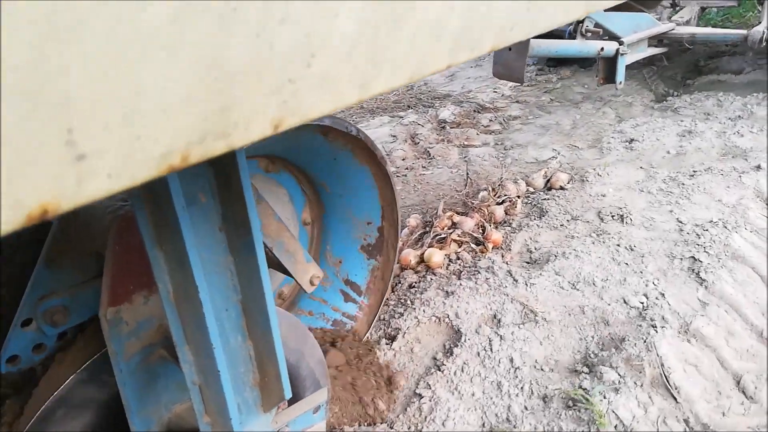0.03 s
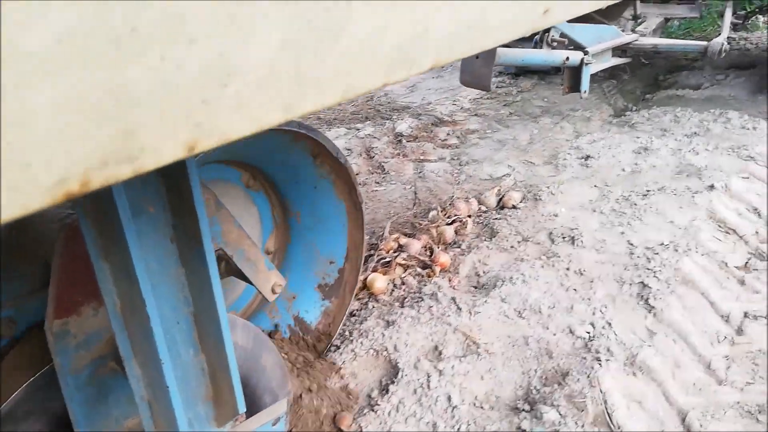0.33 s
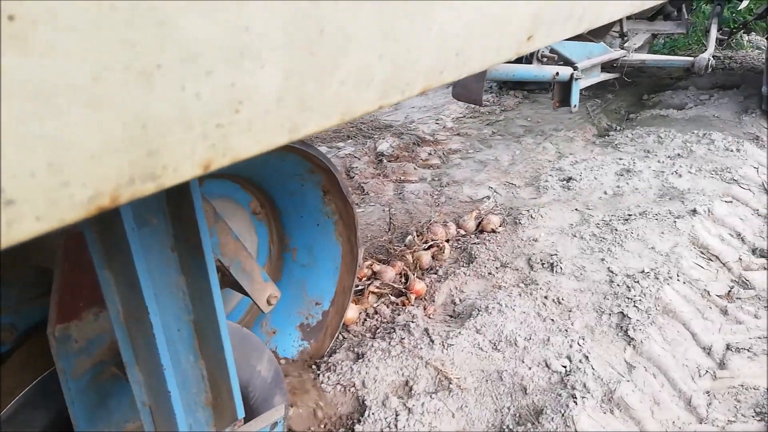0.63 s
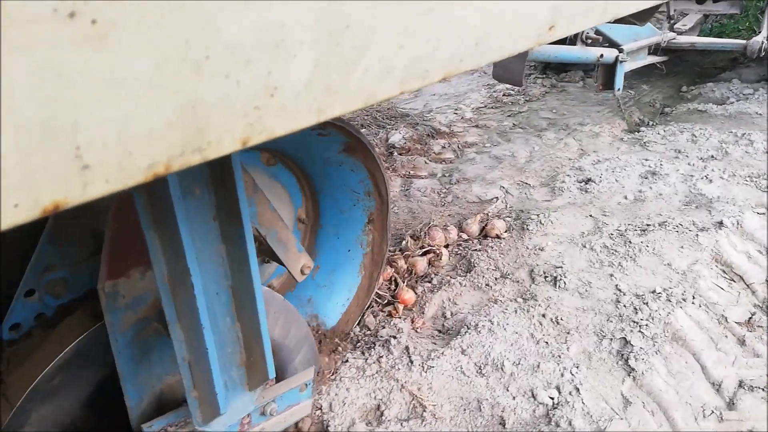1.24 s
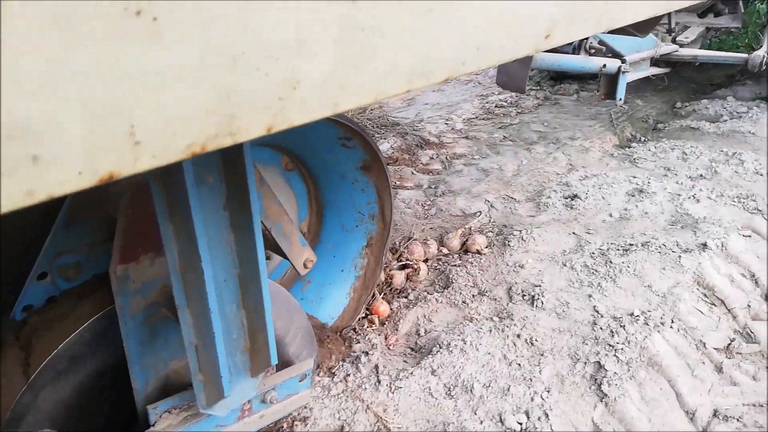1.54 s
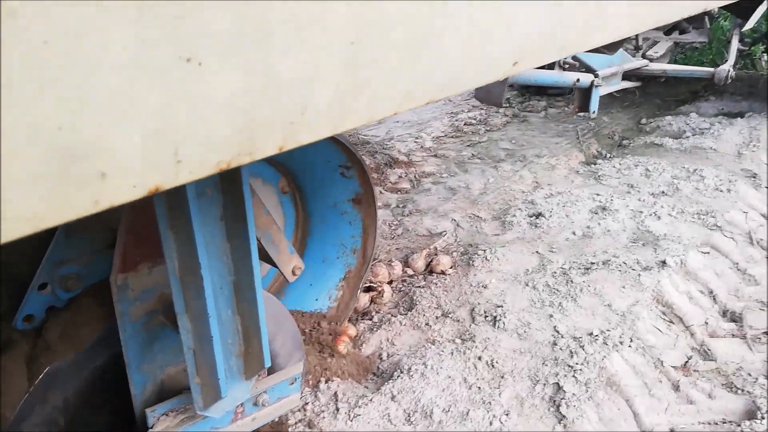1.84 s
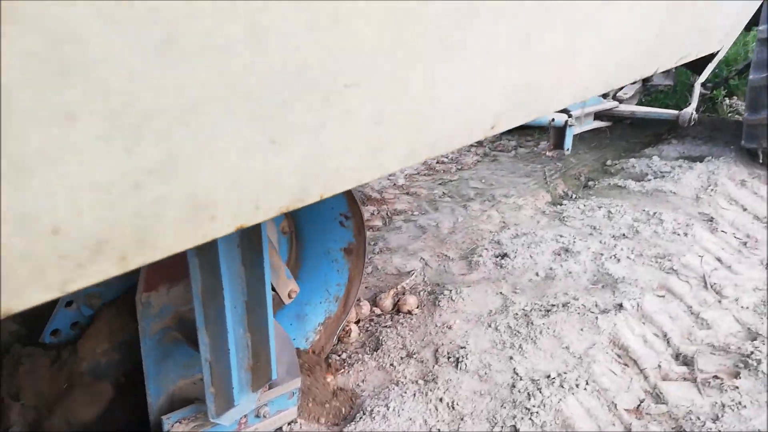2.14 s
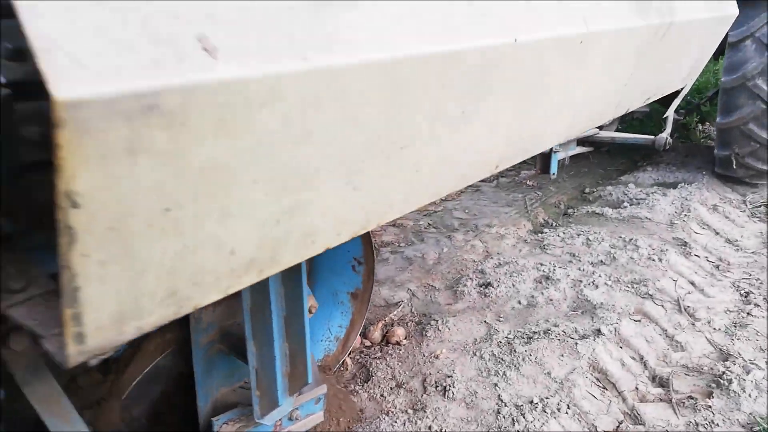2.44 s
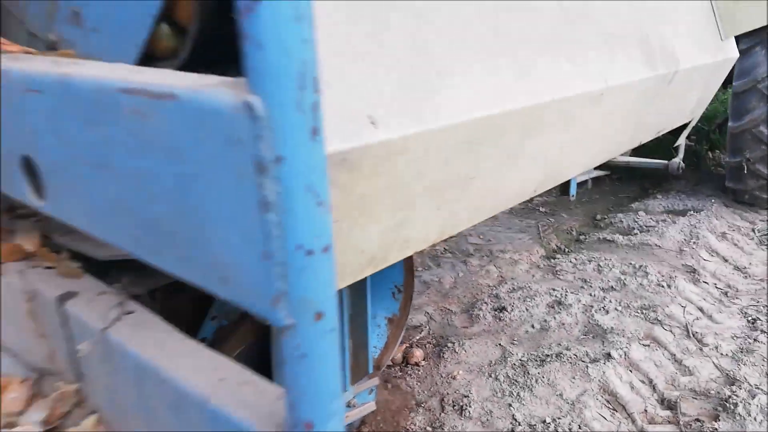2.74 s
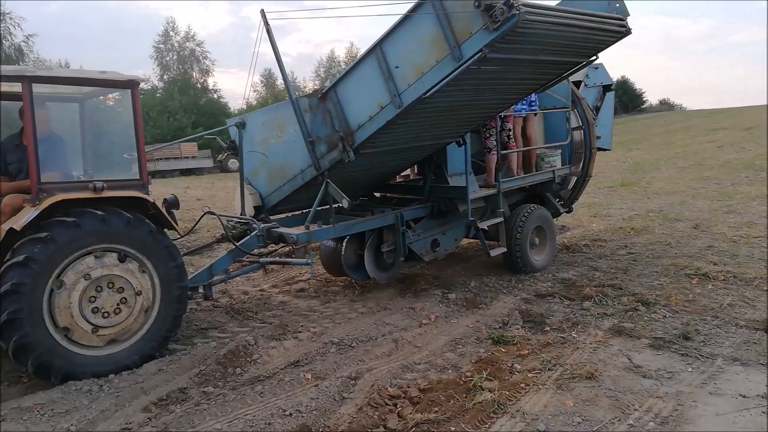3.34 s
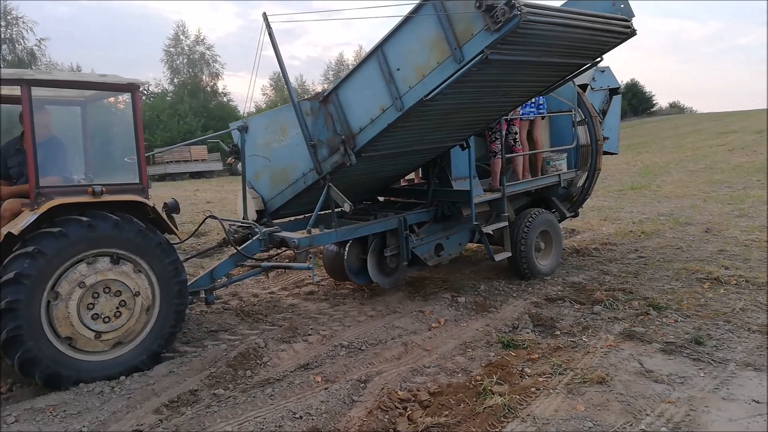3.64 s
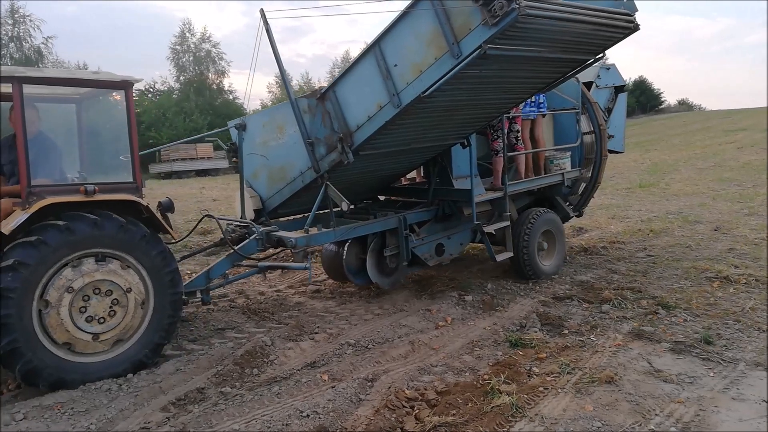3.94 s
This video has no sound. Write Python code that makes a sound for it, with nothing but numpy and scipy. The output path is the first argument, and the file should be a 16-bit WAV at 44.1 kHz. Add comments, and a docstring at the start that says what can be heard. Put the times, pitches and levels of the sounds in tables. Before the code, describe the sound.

A tractor-drawn harvester clatters and rumbles up close over a thumping diesel engine.

```python
"""A tractor's four-cylinder diesel thumps unevenly as it pulls an onion harvester over a dry field.
With the stereo microphone beside the digger, the shaken steel sieve rods clash in bursts, a pivot
squeaks, the running gear rumbles and dry soil and onion skins rustle through; stalks and clods snap.
After a short silence the rig is heard from a few metres off: a slower engine with ticking injection,
and a soft rattle."""
import sys
import numpy as np
from scipy import signal
from scipy.fft import rfft, irfft, next_fast_len
from scipy.io import wavfile
from scipy.ndimage import uniform_filter1d, map_coordinates

SR = 44100
rng = np.random.default_rng(int(sys.argv[2]) if len(sys.argv) > 2 else 0)


def digitize_waveform(pressure):
    """Quantize a signal to 16-bit integers and store it at the path in sys.argv[1].

    Rows of a 2-D input are taken as channels; values are limited to [-1, 1].
    """
    field = np.atleast_2d(pressure).T
    bounded = np.clip(field, -1, 1)
    quanta = np.round(bounded * 32767).astype(np.int16)
    wavfile.write(sys.argv[1], SR, quanta)


N = 176400
NEAR_END_S, FAR_START_S = 3.149, 3.215

# blows between the sieve rods: t/s, low-mode level/dB, high-mode level/dB
ROD_CLASHES = [(0.001, -20.5, -24), (0.036, -17, -16.5), (0.109, -20, -27.5), (0.136, -23, -24.5),
               (0.22, -26, -25), (0.245, -23.5, -23.5), (0.283, -23, -23.5), (0.312, -21.5, -23),
               (0.346, -17.5, -22), (0.455, -19.5, -22.5), (0.483, -21.5, -28.5), (0.514, -23.5, -22.5),
               (0.552, -19, -21), (0.641, -17.5, -19), (0.668, -16, -17.0), (0.712, -18.5, -22),
               (0.763, -19.5, -25.5), (0.849, -23, -34.0), (0.872, -20.5, -22.5), (0.907, -22, -37),
               (0.927, -18.5, -21), (0.949, -18.5, -23), (1.08, -22, -27.5), (1.116, -21.5, -28),
               (1.156, -21, -26.5), (1.191, -24, -28), (1.277, -25.5, -30.5), (1.302, -18.5, -20),
               (1.33, -17.0, -24.5), (1.401, -22.0, -45), (1.506, -17.5, -21), (1.544, -21.5, -18),
               (1.584, -14.5, -21.5), (1.606, -22, -26.5), (1.68, -21.5, -37), (1.715, -14.5, -26.5),
               (1.741, -20.5, -24.5), (1.78, -21.5, -27.5), (1.817, -19.0, -25), (1.923, -21, -29.5),
               (1.951, -19, -21.5), (1.985, -25.5, -33), (2.008, -22.5, -27), (2.033, -20.5, -21),
               (2.151, -15, -25), (2.176, -17.5, -33), (2.233, -16.0, -23), (2.341, -24, -33.5),
               (2.378, -21, -28.5), (2.394, -16.5, -33), (2.418, -21.5, -29), (2.446, -21.5, -35),
               (2.559, -26, -33), (2.587, -19.5, -27), (2.63, -20.5, -23), (2.686, -29, -32),
               (2.767, -21.5, -29.5), (2.797, -25, -32), (2.864, -25, -35), (2.9, -25, -28.5),
               (3.004, -19.5, -27.5), (3.042, -21.5, -19.5), (3.072, -20, -27.5), (3.102, -19.5, -26)]


def amp(db):
    """Decibels to gain."""
    return 10 ** (np.asarray(db) / 20)


def unit(x):
    """Scale to rms 1."""
    return x / np.sqrt(np.mean(x ** 2) + 1e-20)


def along(points, hz):
    """Read (f/Hz, value) points on a log frequency axis."""
    f, v = np.transpose(points)
    return np.interp(np.log(hz + 1), np.log(f + 1), v)


def curve(points):
    """Join (t/s, value) points, one value per sample."""
    return np.interp(np.arange(N) / SR, *np.transpose(points))


def wobble(rate):
    """A smooth random curve, rate knots a second."""
    knots = rng.standard_normal(int(N * rate / SR) + 4)
    return map_coordinates(knots, [np.arange(N) * rate / SR])


def filtered(x, response):
    """Filter x by a gain given as a function of frequency."""
    size = next_fast_len(N + SR // 4)
    return irfft(rfft(x, size) * response(np.fft.rfftfreq(size, 1 / SR)), size)[..., :N]


def add(track, s, sound):
    """Mix a sound into a track at s seconds."""
    i = max(round(s * SR), 0)
    track[..., i:i + sound.shape[-1]] += sound[..., :max(N - i, 0)]


def pulse(colour, size=16384):
    """A minimum-phase pulse with the given spectrum."""
    cepstrum = irfft(np.log(amp(along(colour, np.fft.rfftfreq(size, 1 / SR)))))
    causal = np.r_[cepstrum[0], 2 * cepstrum[1:size // 2]]
    return irfft(np.exp(rfft(causal, size)))


def puffs(events, rise_s, decay_s):
    """An envelope with a quick rise and a decay for each (t/s, level/dB)."""
    level, t = np.zeros(N), np.arange(SR // 8) / SR
    shape = (1 - np.exp(-t / rise_s)) * np.exp(-t / decay_s)
    for s, db in events:
        add(level, s, amp(db) * shape / shape.max())
    return level


def spread(pair, balance):
    """Two unrelated signals become the microphone's partly alike left and right."""
    # likeness of the channels: f/Hz, correlation
    likeness = [(100, 1), (250, 0.92), (600, 0.67), (1500, 0.07), (10000, 0.42)]
    turn = lambda hz: np.arccos(np.clip(along(likeness, hz), 0, .9995)) / 2
    mid, side = filtered(pair, lambda hz: np.array([np.cos(turn(hz)), np.sin(turn(hz))]))
    pan = lambda hz: np.arctan(amp(along(balance, hz)))
    gains = lambda hz: np.sqrt(2) * np.array([np.sin(pan(hz)), np.cos(pan(hz))])
    return filtered(np.array([mid + side, mid - side]), gains)


def noise(colour, grain_db):
    """Stereo noise of rms 1, clumped into millisecond grains."""
    # stereo image, treble to the left: f/Hz, left over right/dB
    balance = [(100, -1), (280, -2.5), (600, 3.5), (900, 1.5), (1300, -4.5), (2100, 1), (2800, 7.5),
               (4000, 8), (6000, 15.5), (9000, 27), (14000, 33)]
    grains = rng.standard_normal((2, N)) * amp(grain_db * wobble(700))
    coloured = filtered(grains, lambda hz: amp(along(colour, hz)))
    return unit(spread(coloured, balance))


def side_panels():
    """The side panels drone as they pass close to the microphone."""
    # drone spectrum: f/Hz, level/dB
    colour = [(100, -25), (240, 2), (350, 1.5), (1200, -28.5)]
    # swell of the drone: t/s, level/dB
    swell = [(1.9, -40.5), (2.7, -33.5), (3.14, -30.5)]
    return amp(curve(swell)) * noise(colour, grain_db=-2.5)


def soil(shaken_share=0.26):
    """Dry soil and skins rustle through the sieve; the clashes throw up a share of the power."""
    # flow through the rods: t/s, level/dB
    flow = [(0, -36.5), (2.2, -36), (2.5, -34), (2.7, -29), (2.87, -32), (3.14, -33)]
    # rustle spectrum: f/Hz, level/dB
    colour = [(1500, -27), (3500, -3), (5500, -3), (7200, -4.5), (8500, 2.5), (9500, 6.5), (10700, -6),
              (12500, -17), (16000, -35)]
    shake = unit(puffs([(s, db) for s, _, db in ROD_CLASHES], rise_s=0.024, decay_s=0.0047))
    level = amp(curve(flow)) * np.sqrt(1 - shaken_share + shaken_share * shake ** 2)
    return level * noise(colour, grain_db=1.5)


def snaps():
    """Dry stalks and clods break with single bright cracks."""
    # breaks: t/s, level/dB
    breaks = [(0.4229, -25), (1.1937, -13.5), (2.698, -23), (3.2234, -20.5), (3.314, -20.5), (3.5622, -16)]
    # crack spectrum: f/Hz, level/dB
    colour = [(1500, -18), (4000, 7), (7000, 4.5), (9500, 14.5), (12000, 1), (16000, -17)]
    return 0.472 * puffs(breaks, rise_s=0.00098, decay_s=0.014) * noise(colour, grain_db=2.5)


def running_gear(colour, db, flutter_db, flutter_hz, grain_db):
    """The running gear rumbles and rattles at a slightly fluttering level."""
    return amp(db + flutter_db * wobble(flutter_hz)) * noise(colour, grain_db)


def pivot_squeak(hz, length_s=0.034, waver=0.047):
    """A dry pivot gives a short wavering tone that swells and fades."""
    size = int(length_s * SR)
    phase = np.cumsum(hz * (1 + waver * wobble(177)[:size])) / SR
    swell = np.sin(np.pi * np.arange(size) / size)
    return np.sqrt(2) * swell * np.sin(2 * np.pi * (phase + rng.random((2, 1))))


def rod_ping(hz=2040, db=-16, t60_s=0.11):
    """One rod, struck cleanly, rings in a single mode."""
    t = np.arange(SR // 7) / SR
    return np.sqrt(2) * amp(db - 60 * t / t60_s) * np.sin(2 * np.pi * (hz * t + rng.random((2, 1))))


def rod_ring(modes, t, detune=0.01605, scatter_db=2):
    """Steel modes; each blow meets a slightly different rod at a different spot."""
    hz, db, t60 = np.transpose(modes * 2)[:, :, None]  # two rods ring at each blow
    hz = hz * (1 + detune * rng.standard_normal(hz.shape))
    fade = amp(db + scatter_db * rng.standard_normal(db.shape) - 60 * t / t60) / np.sqrt(t60)
    phases = rng.random((2, *hz.shape))
    return (fade * np.sin(2 * np.pi * (hz * t + phases))).sum(1)


def rod_clash(modes, rise_s, crack_hz, crack_db, rattle_db):
    """A chatter of steel contacts, then a looser rattle, rings the modes; rms 1 at its loudest."""
    hold_s, chatter_decay_s, rattle_decay_s = 0.016, 0.005, 0.025
    t = np.arange(SR // 7) / SR
    chatter = np.exp(-np.maximum(t - hold_s, 0) / chatter_decay_s)
    rattle = amp(rattle_db) * np.exp(-t / rattle_decay_s)
    force = (1 - np.exp(-t / rise_s)) ** 2 * (chatter + rattle)
    contacts = force * rng.standard_normal(len(t)) * np.sqrt(rng.exponential(size=len(t)))
    tone = signal.fftconvolve(rod_ring(modes, t), contacts[None], axes=1)[:, :len(t)]
    band = signal.butter(2, crack_hz, "band", fs=SR, output="sos")
    crack = signal.sosfilt(band, force * rng.standard_normal((2, len(t))))
    hit = unit(tone) + amp(crack_db) * unit(crack)
    power = uniform_filter1d((hit ** 2).mean(0), int(hold_s * SR))
    return hit / np.sqrt(power.max())


def sieve(rise_s=0.0045):
    """The shaken rods clash in bursts; a pivot squeaks between them and one rod pings."""
    # low and high modes of the rods: f/Hz, level/dB, t60/s
    low_modes = [(1466, 4, 0.14), (1598, -1.5, 0.2), (1705, -4, 0.058), (1930, -0.5, 0.13),
                 (2078, 2, 0.036), (2220, 1, 0.14), (2382, -4, 0.15), (2675, -1.5, 0.044), (2858, 1, 0.085),
                 (3098, -1, 0.1)]
    high_modes = [(3890, -5, 0.082), (4670, -2.5, 0.091), (4873, -4.5, 0.015), (5310, -12, 0.024),
                  (6308, -2.5, 0.045), (6550, -5, 0.037)]
    # squeaks of the pivot: t/s, level/dB, f/Hz
    squeaks = [(.25, -31, 996), (.592, -24, 970), (1.477, -26.5, 1000), (1.897, -27, 974),
               (2.282, -30, 1000)]
    # stereo image of the sieve: f/Hz, left over right/dB
    balance = [(1000, 5.5), (1450, -6), (1750, 4.5), (2100, -3.5), (2500, 7), (2900, 6), (3800, 4),
               (4700, 15.5), (6300, 18), (9000, 23)]
    steel = np.zeros((2, N))
    for s, low_db, high_db in ROD_CLASHES:
        low = rod_clash(low_modes, rise_s, crack_hz=(1350, 3200), crack_db=-4, rattle_db=7)
        high = rod_clash(high_modes, rise_s, crack_hz=(3500, 6600), crack_db=-9, rattle_db=-4)
        add(steel, s - rise_s, amp(low_db - 3) * low + amp(high_db - 3.63) * high)
    for s, db, hz in squeaks:
        add(steel, s, amp(db) * pivot_squeak(hz))
    add(steel, s=2.114, sound=rod_ping())
    return spread(steel, balance)


def firings(speed, cycle_start_s):
    """Four uneven firings to two crank turns, as rows of t/s, exhaust level/dB, tick level/dB."""
    # cylinders: share of the cycle, exhaust level/dB, tick level/dB
    cylinders = [(0, -1.5, -3), (0.252, -3.5, -4), (0.486, -10, -2.5), (0.716, -17, 2.5)]
    t = np.arange(N) / SR
    cycles = np.cumsum(curve(speed)) / SR
    cycles -= np.interp(cycle_start_s, t, cycles)
    return np.array([(np.interp(k + share, cycles, t), thump_db, tick_db)
                     for k in range(-1, int(cycles[-1]) + 1)
                     for share, thump_db, tick_db in cylinders if cycles[0] < k + share < cycles[-1]])


def injection(fired, lag_s=0.0084, scatter_db=1.2):
    """The fuel injection ticks once for each firing."""
    # tick spectrum: f/Hz, level/dB
    colour = [(800, -7), (2500, 8.5), (4500, -0.5), (7000, -1.5), (9400, 6.5), (12000, -9), (16000, -24)]
    ticks = [(s + lag_s, db + rng.normal(0, scatter_db)) for s, _, db in fired]
    level = puffs(ticks, rise_s=0.0019, decay_s=0.01)
    return level / level[int(FAR_START_S * SR):].std() * noise(colour, grain_db=0.5)


def exhaust(fired, colour, jitter_s=0.00041, scatter_db=0.25):
    """Each firing of the diesel sends one pressure pulse through the pipe."""
    kicks = np.zeros(N)
    for s, db, _ in fired:
        late, softer = rng.standard_normal(2)
        add(kicks, s + jitter_s * late, -amp([db - scatter_db * softer]))
    thump = signal.fftconvolve(kicks, pulse(colour))[:N]
    return thump / thump[int(fired[0, 0] * SR):].std()


def near_rig():
    """Microphone beside the digger: gear, panels, sieve and soil around the thump of the diesel."""
    # close spectra of the running gear and the exhaust pulse: f/Hz, level/dB
    gear_colour = [(20, -14), (45, -9.5), (110, -4), (180, -1.5), (300, -6), (480, -10), (700, -10),
                   (880, -9), (985, -4), (1150, -10.5), (1330, -8), (1460, -6.5), (1700, -14), (2200, -16),
                   (3000, -18.5), (3700, -29), (6500, -68), (15000, -62)]
    pipe_colour = [(18, -56.5), (36, -10.5), (49, -9.5), (60, 4.5), (80, -8), (108, -4), (145, -10.5),
                   (190, -23.5), (300, -24), (700, -64)]
    # engine speed: t/s, cycle rate/Hz
    speed = [(0, 12.3), (.5, 12.27), (.7, 12.18), (1.15, 12.2), (1.35, 12.3), (2.4, 12.28), (2.8, 12.42),
             (3.14, 12.6)]
    gear = running_gear(gear_colour, db=-27.5, flutter_db=1, flutter_hz=24.96, grain_db=1.5)
    drone = side_panels()
    thump = amp(-24.5) * exhaust(firings(speed, cycle_start_s=0.071), pipe_colour)
    return gear + drone + sieve() + soil() + thump


def far_rig():
    """Microphone a few metres from the tractor: rattling gear, injection ticks and a slower thump."""
    # distant spectra of the running gear and the exhaust pulse: f/Hz, level/dB
    gear_colour = [(20, -8), (60, -0.5), (230, -1), (350, -14.5), (570, -7.5), (900, -10.5), (1400, -9),
                   (2100, -11), (3500, -22), (6500, -29), (9400, -27), (12000, -42.5), (16000, -58)]
    pipe_colour = [(18, -69), (36, -27), (54, 10.5), (80, 3.5), (120, 4.5), (150, -20.5), (175, -12),
                   (220, -10), (340, -33), (700, -63)]
    # engine speed: t/s, cycle rate/Hz
    speed = [(3.2, 10.72), (4, 11.2)]
    # swell and fall of the whole rig: t/s, level/dB
    swell = [(3.22, 2.5), (3.33, 4), (3.5, 1), (4, 0)]
    fired = firings(speed, cycle_start_s=3.287)
    ticks = amp(-43) * injection(fired)
    gear = running_gear(gear_colour, db=-29, flutter_db=0.39, flutter_hz=30, grain_db=-1)
    thump = amp(-26) * exhaust(fired, pipe_colour)
    return amp(curve(swell)) * (gear + ticks + thump)


def scene(right_lag_s=0.00044):
    """Close position, a moment of silence, far position; the sound reaches the left capsule first."""
    t = np.arange(N) / SR
    field = near_rig() * (t < NEAR_END_S) + far_rig() * (t > FAR_START_S) + snaps()
    lags_s = np.array([[0], [right_lag_s]])
    return filtered(field, lambda hz: np.exp(-2j * np.pi * hz * lags_s))


def record(dry, top_hz=15800):
    """The microphone chain passes nothing above its band limit."""
    return filtered(dry, lambda hz: hz < top_hz)


dry = scene()
out = record(dry)
digitize_waveform(out)
```